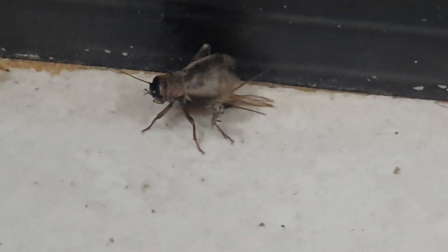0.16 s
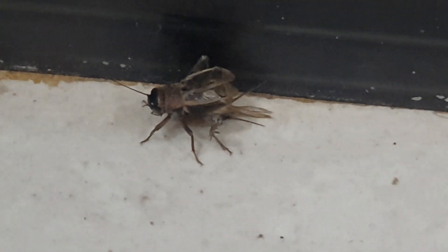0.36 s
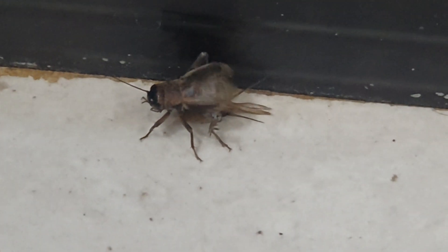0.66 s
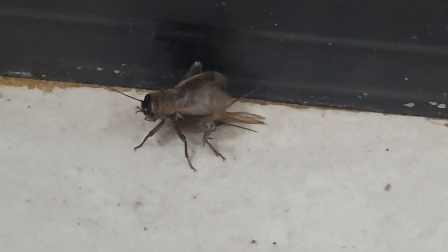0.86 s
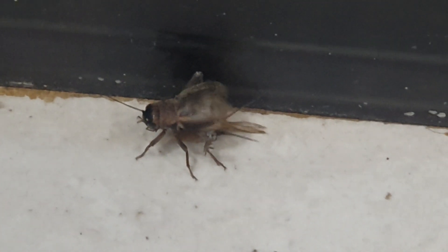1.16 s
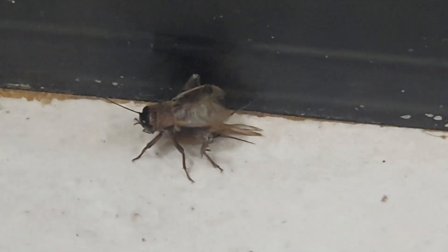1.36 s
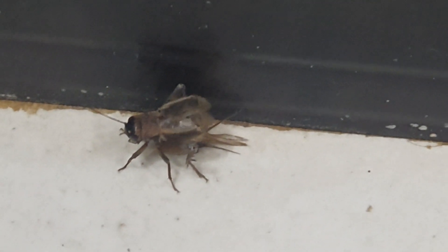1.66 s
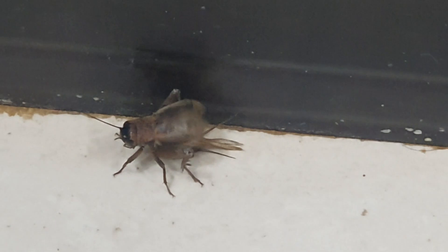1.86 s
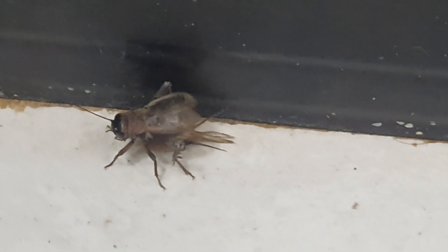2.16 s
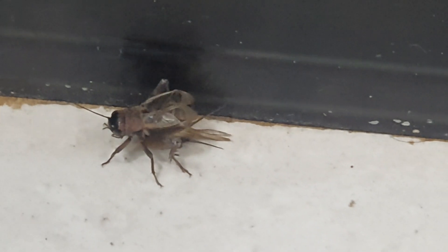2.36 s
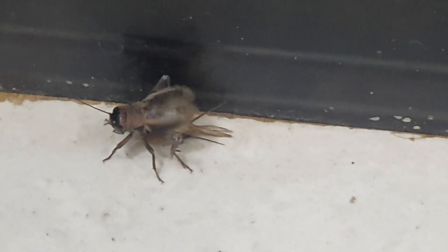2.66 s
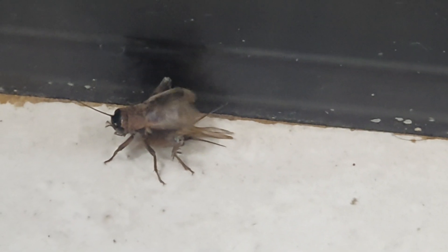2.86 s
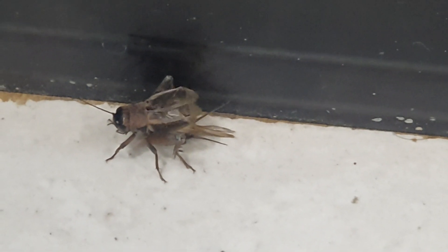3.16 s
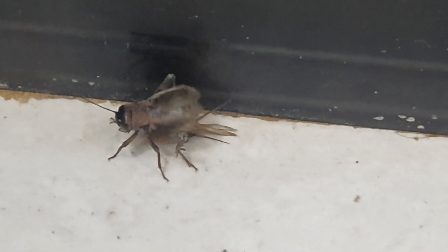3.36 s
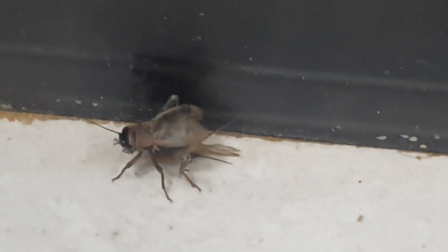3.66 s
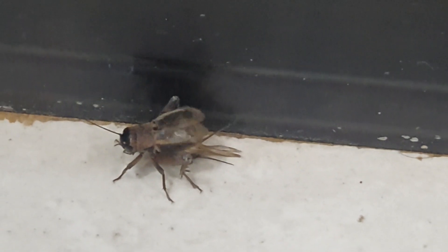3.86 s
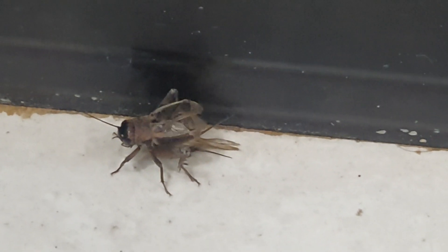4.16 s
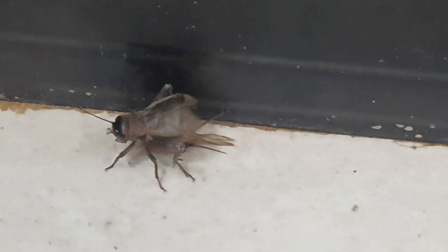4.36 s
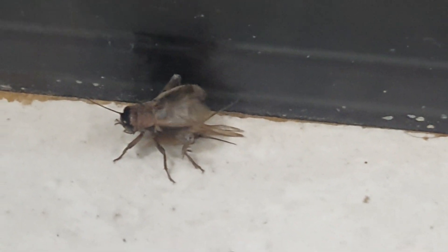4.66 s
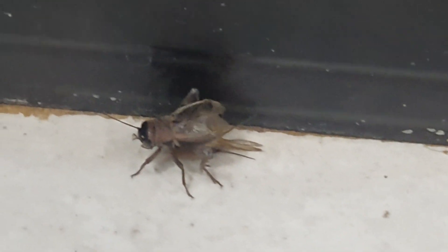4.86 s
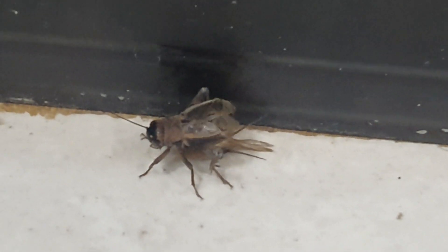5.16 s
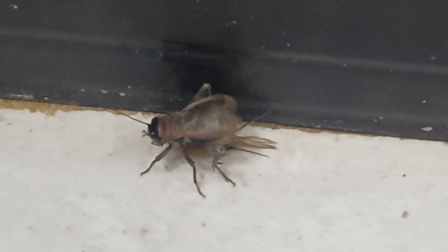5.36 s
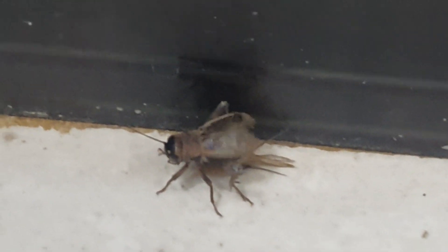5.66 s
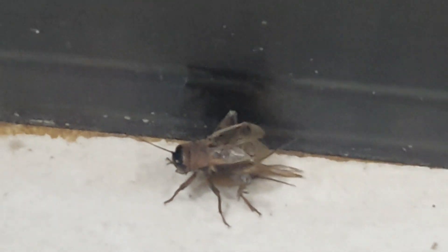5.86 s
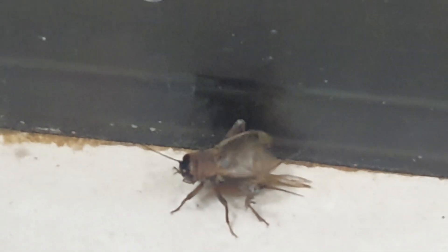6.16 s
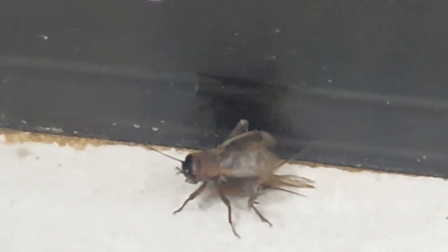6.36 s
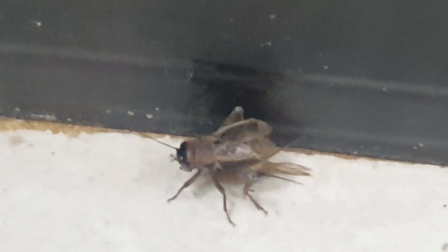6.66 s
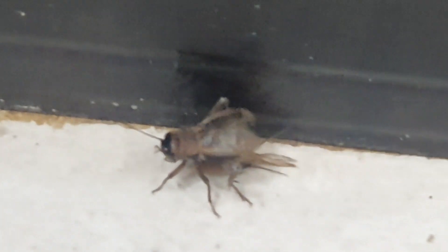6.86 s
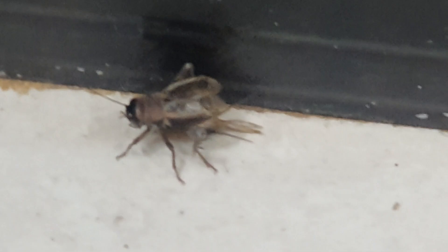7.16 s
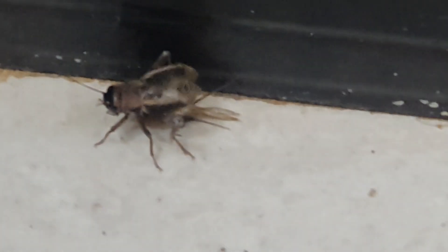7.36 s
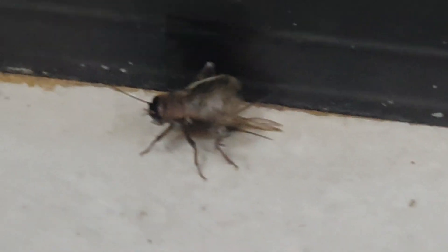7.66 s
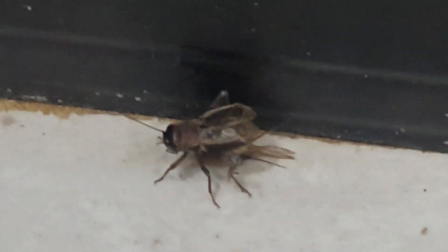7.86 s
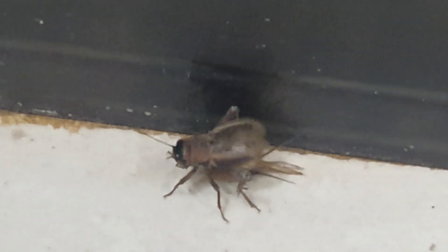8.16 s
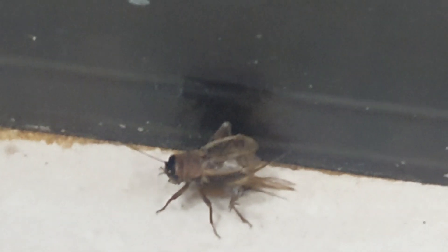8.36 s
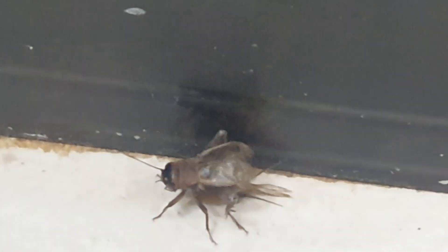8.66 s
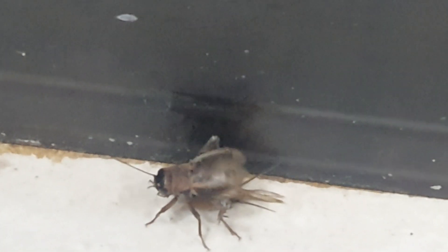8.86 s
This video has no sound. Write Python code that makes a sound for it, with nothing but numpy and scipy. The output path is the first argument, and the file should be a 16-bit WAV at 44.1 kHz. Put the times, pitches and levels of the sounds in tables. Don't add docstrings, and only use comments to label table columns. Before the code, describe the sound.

A close cricket is already singing at the start and keeps going to the end. Each wing stroke is a tiny, shrill, raspy chirp with a glassy octave above; bursts begin weakly with quick strokes, then settle into stronger, slower ones. Lighter strokes link many of the bursts. The hard room adds ringing reflections, the phone's stereo sound is slightly uneven, and a distant motor hums under quiet hiss.

```python
import sys
import numpy as np
from scipy import signal
from scipy.fft import rfft, irfft, next_fast_len
from scipy.io import wavfile
from scipy.ndimage import uniform_filter1d

SR = 44100
rng = np.random.default_rng(int(sys.argv[2]) if len(sys.argv) > 2 else 0)


def generate_wav(signal):
    frames = np.transpose(np.atleast_2d(signal))
    scaled = np.clip(frames, -1, 1) * 32767
    pcm = np.round(scaled).astype(np.int16)
    wavfile.write(sys.argv[1], SR, pcm)


def field_ratio(decibels):
    return 10 ** (np.asarray(decibels, dtype=float) / 20)


N = 397782
LEAD = SR // 2
SPLIT_HZ = 8600


def on_log(hz, table, column=1):
    table = np.array(table)
    return np.interp(np.log(np.maximum(hz, 1)), np.log(table[:, 0]), table[:, column])


def shape(x, gain):
    size = next_fast_len(x.shape[-1])
    hz = np.arange(size // 2 + 1) * SR / size
    return irfft(rfft(x, size) * gain(hz), size)[..., :x.shape[-1]]


def peak(hz, width_hz):
    return lambda f: 1 / (1 + 2j * (f - hz) / width_hz)


def lag(ms):
    return lambda f: np.exp(-2j * np.pi * f * ms / 1000)


def level(x, db):
    return x * field_ratio(db) / np.sqrt(np.mean(x ** 2))


def lay(start_s, pieces):
    out = np.zeros(LEAD + N)
    first = LEAD + (start_s * SR).astype(int)
    np.add.at(out, first + np.arange(pieces.shape[1]), pieces)
    return out


# first_end_s, first_slow_end_s, last_end_s, level_db
PHRASES = [(0.0776, 0.1565, 0.2324, -13), (0.4193, 0.5047, 0.5837, -13), (0.7747, 0.8575, 0.9336, -13.5),
           (1.142, 1.223, 1.3032, -13.5), (1.49, 1.5697, 1.6486, -13), (1.8342, 1.911, 1.9889, -13),
           (2.201, 2.275, 2.3521, -13.5), (2.5295, 2.605, 2.6816, -13), (2.8354, 2.908, 3.0236, -14),
           (3.2532, 3.3346, 3.4149, -13.5), (3.6035, 3.6896, 3.7683, -13), (3.957, 4.0396, 4.1207, -13.5),
           (4.31, 4.3888, 4.471, -14), (4.664, 4.7393, 4.8138, -14), (4.983, 5.0575, 5.134, -13.5),
           (5.328, 5.4046, 5.485, -14.5), (5.675, 5.7591, 5.838, -13.5), (6.027, 6.1117, 6.1887, -13),
           (6.4712, 6.5566, 6.6358, -13.5), (6.8433, 6.922, 7.0048, -13.5), (7.1986, 7.283, 7.3608, -13.5),
           (7.5812, 7.663, 7.7394, -15), (8.01, 8.09, 8.1681, -15.5), (8.4032, 8.487, 8.5675, -15.5),
           (8.7905, 8.8712, 8.9455, -16)]
# after_first_ms, length_ms, level_re_phrase_db
QUICK = [
    (0, 11.6, -6),
    (22.09, 14.1, -2),
    (45.4, 16, -0.73),
]
# first_end_s, first_db, second_db
PAIRS = [(0.3166, -19, -16), (0.6677, -19, -15.5), (1.0378, -21, -15.5), (1.3864, -19.5, -15.5),
         (1.732, -19.5, -15.5), (2.0975, -18, -16), (3.1437, -22.5, -19), (3.501, -20.5, -19.5),
         (3.8528, -19, -16.5), (4.2062, -20.5, -20), (4.5582, -20.5, -16.5), (5.2226, -20, -21.5),
         (5.5686, -22, -15.5), (5.9228, -20, -17), (6.3648, -20, -13.5), (7.095, -21.5, -17),
         (7.4756, -21, -16), (8.2942, -20.5, -20.5), (8.684, -21, -22.5)]
# end_s, level_db
LONE = [(2.4431, -21), (4.904, -19.5), (6.279, -18), (6.758, -22), (7.827, -20)]


def strokes():
    lone_ms, slow_ms, slow_gap_ms = 14.5, 17.6, 39
    last_db = 0.16
    rows = [(end_s, lone_ms, db) for end_s, db in LONE]
    for end_s, first_db, second_db in PAIRS:
        gap_ms = 23.1 + 0.5 * (second_db + 15.5)
        rows += [(end_s, 14, first_db), (end_s + gap_ms / 1000, 13, second_db)]
    for first_s, slow_s, last_s, db in PHRASES:
        rows += [(first_s + after_ms / 1000, ms, db + re_db) for after_ms, ms, re_db in QUICK]
        count = round((last_s - slow_s) * 1000 / slow_gap_ms) + 1
        for end_s in np.linspace(slow_s, last_s, count):
            rows.append((end_s, slow_ms, db + last_db * (end_s == last_s)))
    rows = np.array(sorted(rows))
    scatter_ms, scatter_db = 0.9, 0.5
    return rows + rng.standard_normal(rows.shape) * [0, scatter_ms, scatter_db]


# freq_hz, left_db, right_db
WING = [(6080, -18, -6.5), (6148, 0, -3), (6465, 7.5, 5.5), (6706, 4, 3), (6800, 8.5, 3), (6960, -2.5, 3),
        (7010, -3, -8)]
# freq_hz, left_db, right_db
OCTAVE = [(11970, -28.5, -21), (12500, -27, -20.5), (12740, -29.5, -23), (13830, -28, -36),
          (13900, -31, -33), (14200, -40, -36)]


def cricket():
    rows = strokes()
    phrase_s = 0.3424
    rows = np.vstack([rows[:8] - [phrase_s, 0, 0], rows])
    end_s, ms, db = rows.T[:, :, None]
    start_s = end_s - ms / 1000
    t_ms = np.arange(1200) * 1000 / SR
    done = np.clip(t_ms / ms, 0, 1)
    wobble = uniform_filter1d(rng.standard_normal((len(rows), 2, len(t_ms))), size=70)

    start_hz, end_hz, bend = 6864, 5968, 1.385
    top_hz = start_hz + 22.7 * (ms - 16) + 17.0 * (db + 16.5) + 45 * rng.standard_normal((len(rows), 1))
    hz = (top_hz - (top_hz - end_hz) * done ** bend) * (1 + 0.019 * wobble[:, 0])
    phase = 2 * np.pi * (np.cumsum(hz, axis=1) / SR + rng.random((len(rows), 1)))

    ring_up = 1 - np.exp(-t_ms / 1.26)
    die_away = np.exp(-np.maximum(t_ms - ms, 0) / 0.18)
    swing = ring_up * die_away * field_ratio(2.9 * wobble[:, 1])

    tone, octave = [], []
    for port in (1, 2):
        tone_gain = field_ratio(db + on_log(hz, WING, port))
        tone.append(lay(start_s, tone_gain * swing * np.sin(phase)))
        octave_gain = field_ratio(0.24 * db - 10.0 + on_log(2 * hz, OCTAVE, port))
        octave.append(lay(start_s, octave_gain * swing * np.sin(2 * phase)))
    tone = shape(np.array(tone), lambda f: 1 / np.sqrt(1 + ((f - 6650) / 1150) ** 6))
    return tone + scrapes(start_s, ms, db, t_ms, done) + np.array(octave)


# freq_hz, left_db, right_db
SCRAPE = [(3910, -35, -21.5), (5580, -3.5, -5), (7050, -2, 11), (7780, 9.5, 0.5), (8800, 1.5, -1.5),
          (9720, 2.5, 5.5), (10500, -22, 1.5), (12300, -14, 0), (14300, -16, -8), (15400, -12, -16)]


def scrapes(start_s, ms, db, t_ms, done):
    size = done.shape
    catch = field_ratio(4.0) * t_ms / 0.74 * np.exp(1 - t_ms / 0.59)
    leave = field_ratio(1.0) * np.exp(-np.abs(t_ms - ms + 0.5) / 0.93)
    rasp = field_ratio(-8.5) * np.sin(np.pi * done) ** 2
    swell = field_ratio(0.62 * db - 27.5) * (catch + leave + rasp)
    noise = lay(start_s, swell * rng.standard_normal(size))
    for before_ms in (5.5, 10.5):
        brush_s = start_s - (before_ms + 0.8 * rng.standard_normal((len(ms), 1))) / 1000
        noise = noise + lay(brush_s, field_ratio(-42) * np.exp(-t_ms / 2.1) * rng.standard_normal(size))
    return np.array([shape(noise, lambda f: field_ratio(on_log(f, SCRAPE, port))) for port in (1, 2)])


# delay_ms, left_db, right_db
ECHOES = [(1.322, -31, -14), (4.203, -11, -9), (7.1, -25, -23), (9.8, -40, -15.5), (13.71, -11, -13.5),
          (21.66, -21.5, -21.5), (29.5, -20, -9)]
# left_db, right_db, t60_s
TAIL = [
    (-7, -2, 0.79),
    (-6.5, -7, 0.37),
]


def room(voice):
    t = np.arange(SR) / SR
    grain = rng.standard_normal((2, 2, SR)) * (1 - np.exp(-t / 0.0062))

    upward_db = [(10500, -8.5), (12300, -1.5), (13200, 8.5), (13800, 6), (14300, -5)]
    upward = lambda f: field_ratio(on_log(f, upward_db) * (f > SPLIT_HZ))
    tail = 0
    for band, (left_db, right_db, t60_s) in enumerate(TAIL):
        decay = field_ratio(np.array([[left_db], [right_db]]) - 60 * t / t60_s)
        fading = grain[band] * decay * np.sqrt(6 * np.log(10) / t60_s / SR)
        tail = tail + shape(fading, lambda f: ((f > SPLIT_HZ) == band) * upward(f))
    wet = signal.fftconvolve(voice[1:], tail, axes=1)[:, :LEAD + N]

    tone_lag_ms, treble_lag_ms = 0.415, 0.078
    late = lambda f: lag(np.where(f > SPLIT_HZ, treble_lag_ms, tone_lag_ms))(f)
    dull = lambda f: field_ratio(-8 * (f > SPLIT_HZ))
    near = []
    for port in (0, 1):
        echoes = lambda f: sum(field_ratio(echo[1 + port]) * lag(echo[0])(f) for echo in ECHOES)
        near.append(shape(voice[port], lambda f: late(f) ** port * (1 + dull(f) * echoes(f))))
    port_db = np.array([[-2.5], [2.05]])
    return (near * field_ratio(port_db) + wet)[:, LEAD:]


# freq_hz, density_db
AIR = [(18, -28), (30, -10), (93, -6), (119, -9), (150, -6), (177, -7.5), (280, -12.5), (846, -20.5),
       (1060, -25.5), (2450, -27), (3100, -33.5), (3700, -34.5), (5000, -37.5), (9000, -55)]
# freq_hz, left_minus_right_db
AIR_BALANCE = [(60, 0), (380, 0), (700, 0.5), (1290, -6.5), (2500, -5), (3100, -3.5), (4400, -7)]
# freq_hz, likeness_0_to_1
AIR_SHARED = [(60, .97), (200, .93), (350, .72), (700, .55), (1400, .35), (4000, .25)]


def air():
    shared, left, right = rng.standard_normal((3, N))
    alike = lambda f: np.clip(on_log(f, AIR_SHARED), 0, 1)
    ports = []
    for port, own in enumerate((left, right)):
        late = lambda f: lag(port * np.clip((f - 600) / 1500, 0, 0.36))(f)
        common = shape(shared, lambda f: np.sqrt(alike(f)) * late(f))
        mix = common + shape(own, lambda f: np.sqrt(1 - alike(f)))
        colour = lambda f: field_ratio(on_log(f, AIR) - port * on_log(f, AIR_BALANCE))
        ports.append(shape(mix, lambda f: colour(f) * f / (f + 150j)))
    return level(np.array(ports), -52.5)


# time_s, shaft_db, second_order_db
HUM = [(0.0, -63, -58), (0.48, -52, -59.5), (0.98, -51, -50.5), (1.56, -68, -53), (2.66, -56, -59),
       (3.32, -47.5, -53), (4.17, -65, -58), (4.39, -54, -56), (5.07, -49, -54), (6.73, -68, -55.5),
       (7.01, -57, -54), (7.96, -54, -57), (8.01, -56, -73), (8.09, -63, -56.5), (8.89, -52, -49.5),
       (9.02, -53, -52)]
# freq_hz, width_hz, level_db
DRONE = [(38.2, 3.3, -66.5), (82.1, 10.3, -57), (123.1, 4.1, -60.5), (162.7, 6.6, -67.5),
         (196.1, 11.6, -68)]


def machine():
    time_s, shaft_db, second_db = np.transpose(HUM)
    t = np.arange(N) / SR
    narrow = lambda hz, width_hz: shape(rng.standard_normal(N), lambda f: peak(hz, width_hz)(f) ** 2)
    shaft = np.sqrt(2) * field_ratio(np.interp(t, time_s, shaft_db)) * np.sin(2 * np.pi * 49.0 * t)
    second = field_ratio(np.interp(t, time_s, second_db)) * level(narrow(94.2, 10.3), -0.47)
    flutter = level(shape(rng.standard_normal(N), peak(147.6, 5.7)), -9.0)
    third = level(np.sin(2 * np.pi * 147.5 * t) + flutter, -57)
    modes = sum(level(narrow(hz, 1.6 * width_hz), db) for hz, width_hz, db in DRONE)
    side = level(narrow(70, 97), -65.0)
    return shaft + second + third + modes + side * np.array([[1], [-1]])


def scene():
    return room(cricket()) + air() + machine()


def low_pass(x):
    return signal.sosfilt(signal.butter(12, 15730, fs=SR, output="sos"), x)


def record(dry):
    return low_pass(dry)


dry = scene()
out = record(dry)
generate_wav(out)
```